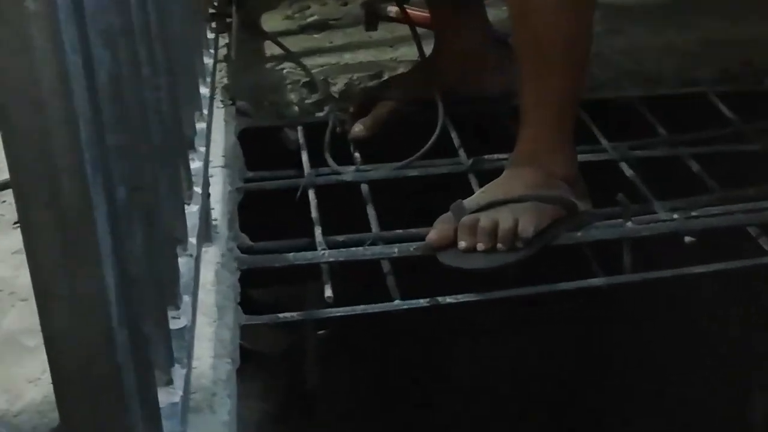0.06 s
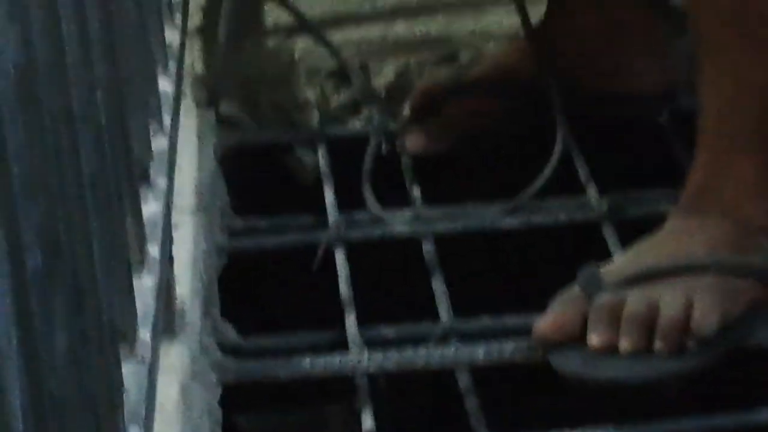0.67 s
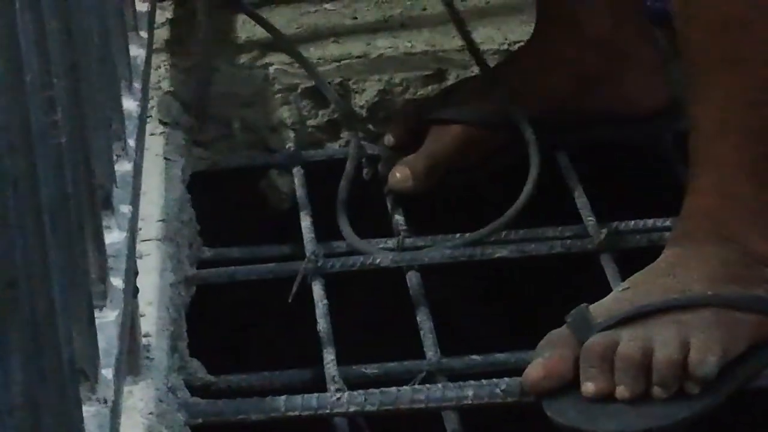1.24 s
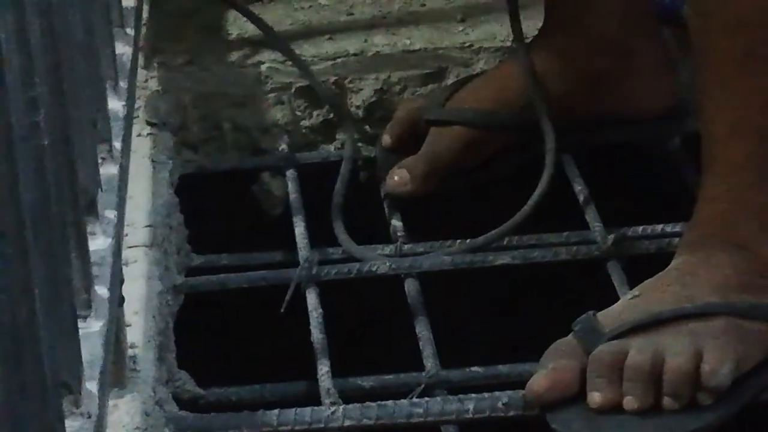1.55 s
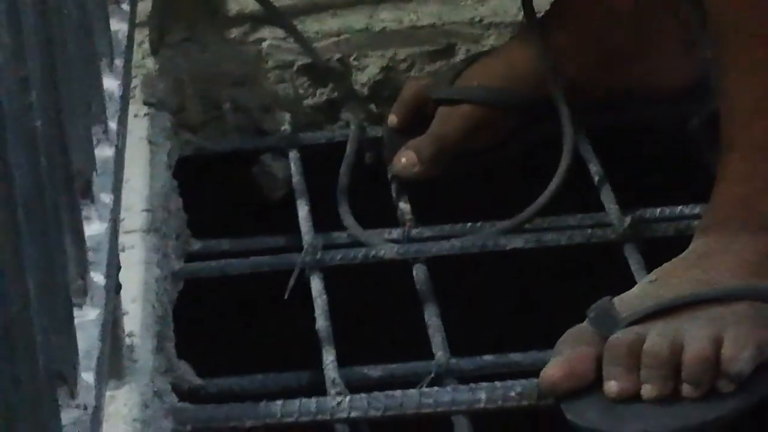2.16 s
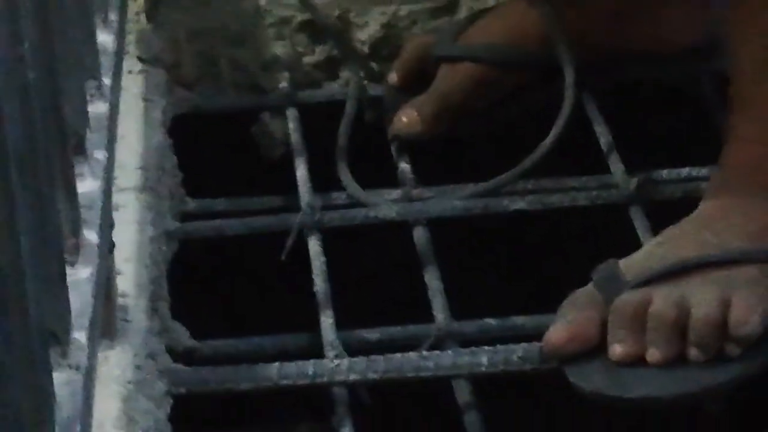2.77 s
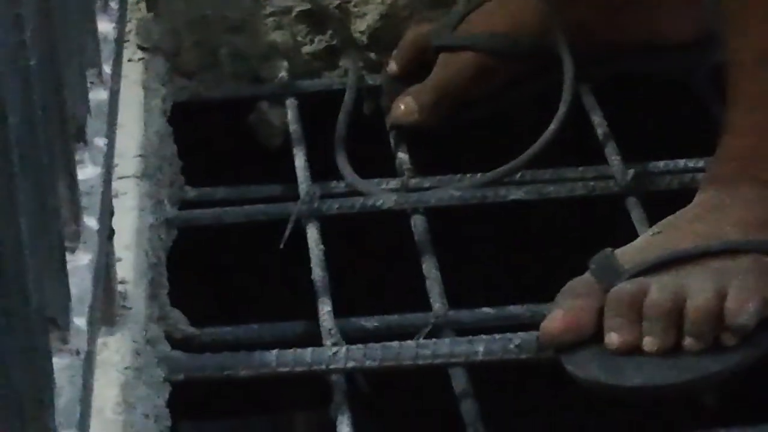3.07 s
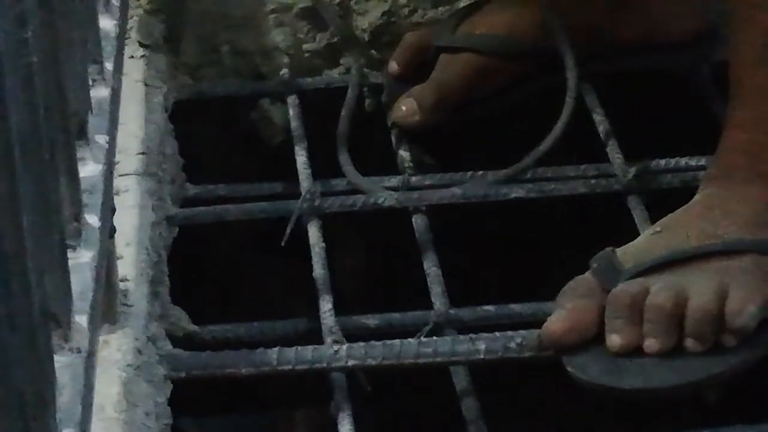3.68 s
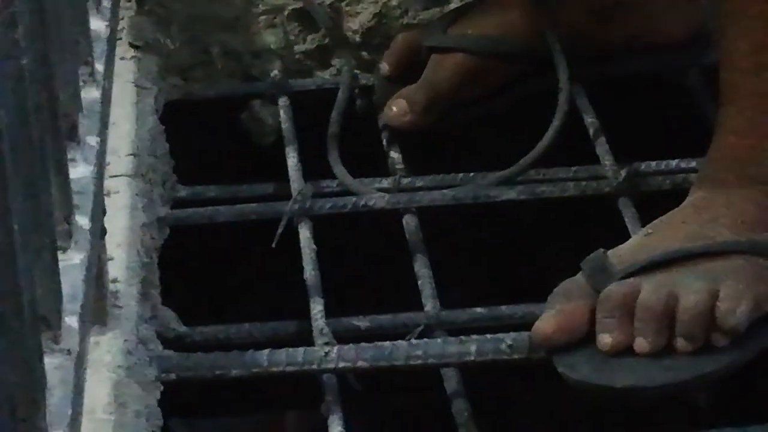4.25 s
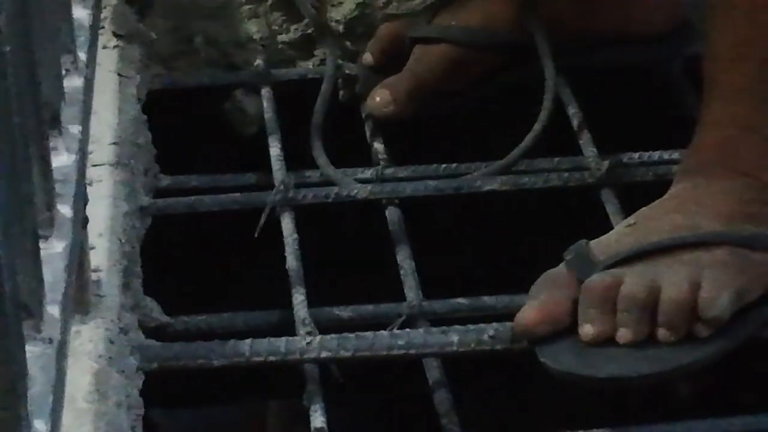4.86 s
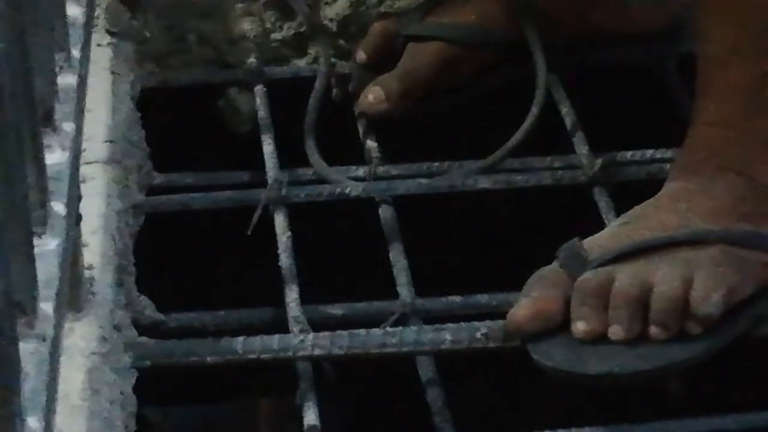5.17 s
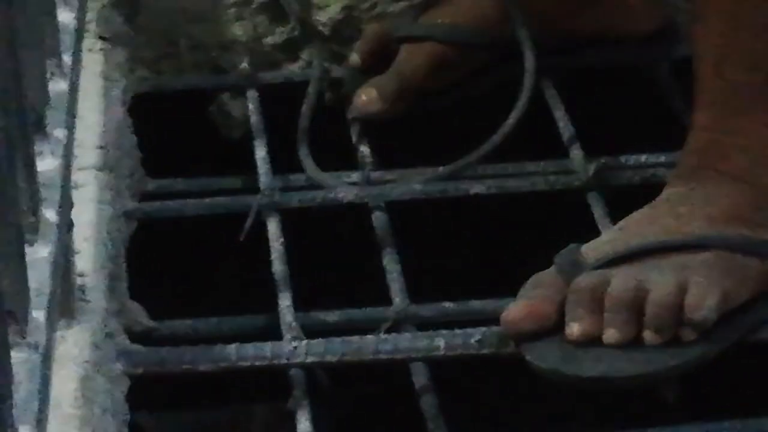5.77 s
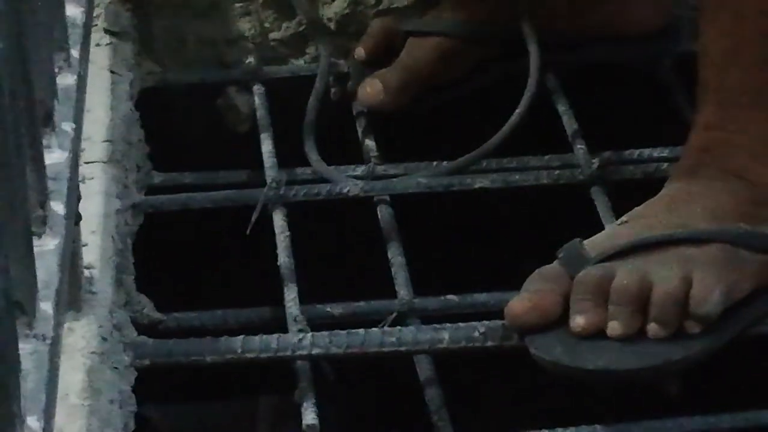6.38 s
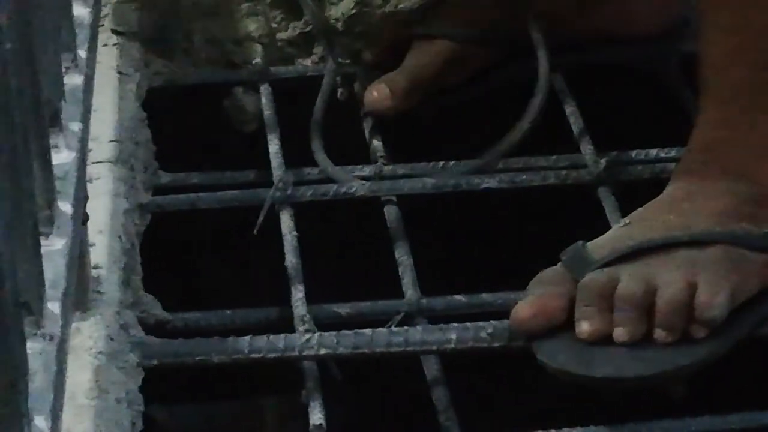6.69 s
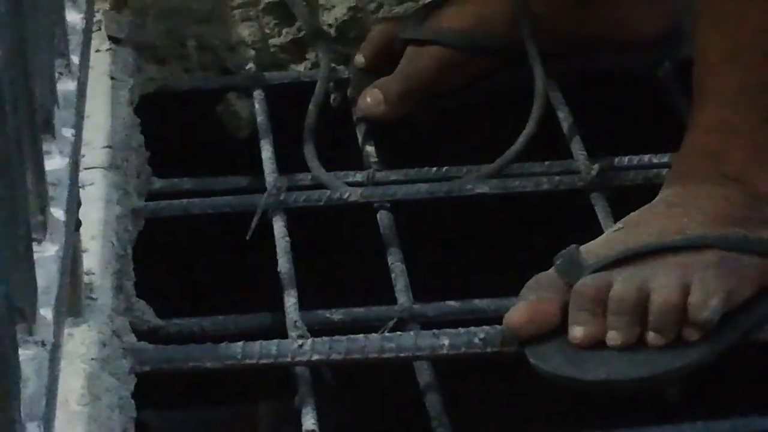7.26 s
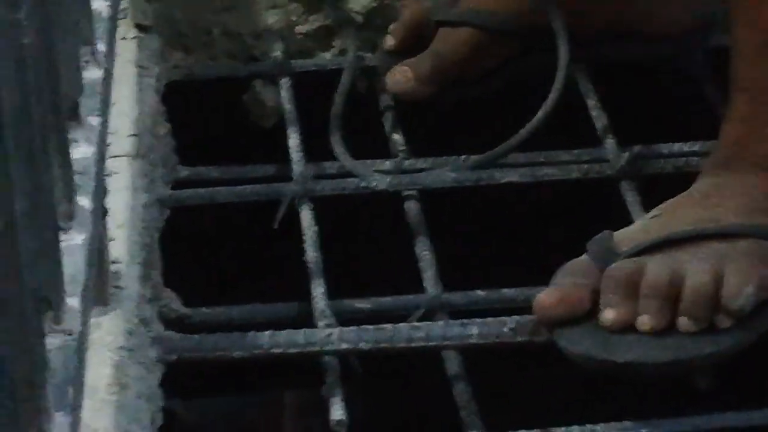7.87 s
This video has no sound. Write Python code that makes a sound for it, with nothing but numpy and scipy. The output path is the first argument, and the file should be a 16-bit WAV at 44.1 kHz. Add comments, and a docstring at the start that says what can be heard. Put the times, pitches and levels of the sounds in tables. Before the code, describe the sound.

An electric demolition hammer works on concrete about a metre away, outdoors, over a faint low site rumble. Separate sharp blows at 0.2 seconds speed into loud, bright, metallic hammering, and concrete cracks off at about 1 second. The motor whines briefly, then coasts down with a hissing rattle and falling pitch. It revs again at 3.1 seconds for a very short burst, ending with chisel clinks and a crack at 3.5, then winds down again. Between 4.6 and 5.4 seconds come soft dull knocks and a brief scrape on a steel bar, and a faint thin whistle slides down around 5.3. The motor restarts at 5.5 and hammers until 6.5, with thumps and splitting concrete, ending in a sharp crack and clinks. It races briefly and coasts. At 7.5 seconds separate blows return, quickening into a last short burst just before 8.

```python
"""Demolition hammer on concrete

An electric hammer chips at a slab in short bursts, about a metre away. Each blow cracks off the
steel chisel and shakes the slab, and now and then a piece splits off. The motor drives a fan,
whining gears and the striker; between bursts it coasts down with a rushing rattle. In the pauses
the tool is shifted with dull knocks and a thin whistle falls, over the low rumble of the site."""
import sys
import numpy as np
from scipy import signal
from scipy.fft import rfft, irfft, next_fast_len
from scipy.io import wavfile
from scipy.ndimage import uniform_filter1d

SR = 44100
rng = np.random.default_rng(int(sys.argv[2]) if len(sys.argv) > 2 else 0)


def master(y):
    """Save y as 16-bit WAV."""
    cut = np.clip(np.atleast_2d(y).T, -1, 1)
    pcm = np.round(cut * 32767)  # scale
    wavfile.write(sys.argv[1], SR, pcm.astype(np.int16))


N = 349713
TIME = np.arange(N) / SR

# Bursts of hammering. Each row: time the chisel is set on the concrete in seconds, time of the first driven
# blow in seconds, end in seconds.
BURSTS = [(.216, .4629, 1.015), (3.243, 3.243, 3.465), (5.599, 5.599, 6.52), (7.491, 7.8539, 7.929)]
# How hard the blows land, a curve per burst. Each row: time in seconds, chisel, slab and thump in dB.
FORCE = [
    [(.49, -5.5, -26, -33), (.64, -6, -21.5, -40), (.78, -7, -23.5, -26), (.9, -7.5, -33, -18),
     (.96, -11.5, -27.5, -31), (1.0, -10, -47, -27)],
    [(3.24, -9, -35, -39), (3.29, -8.5, -30, -49), (3.38, -5, -24.5, -26), (3.45, -12.5, -39, -32)],
    [(5.6, -9.5, -33.5, -57), (5.71, -9, -27, -25), (5.92, -9, -26.5, -30), (6.1, -9.5, -24, -21.5),
     (6.42, -7.5, -25, -22), (6.51, -11.5, -28.5, -28)],
    [(7.82, -8.5, -28.5, -38), (7.93, -9, -29, -33)],
]
def driven_blows(dig_s=.2):
    """One blow per crank turn. Each row: seconds, chisel dB, slab dB, depth from 0 to 1, thump dB."""
    turns, rows = crank()[1], []
    for (_, start, end), force in zip(BURSTS, FORCE):
        first_turn, last_turn = np.interp([start, end], TIME, turns)
        times = np.interp(np.arange(first_turn, last_turn), turns, TIME)
        chisel_db, slab_db, thump_db = follow(force, times)
        buried = 1 - np.exp(-(times - start) / dig_s)
        rows.append(np.transpose([times, chisel_db, slab_db, buried, thump_db]))
    return np.vstack(rows)


# Colour of the chisel's crack. Each row: frequency in Hz, level in dB.
CHISEL_COLOUR = [(500, -18), (1500, -60), (2800, -15), (3400, -7.5), (4300, -4.5), (5600, -0.5), (7400, 1),
                 (8900, 2.5), (10300, 4), (11800, -0.5), (13000, -1), (14200, -15), (15800, -14)]
def chisel_crack(t, grain, chisel_db, buried, alike=.67):
    """Steel snaps on steel and rebounds; as the chisel digs in, crumbs soften and stretch the crack."""
    bright = blend(grain, noise(CHISEL_COLOUR, len(t)), alike)
    hardness = np.clip((chisel_db + 18) / 8, 0, 1)  # light taps only clack in the gear housing
    bright = blend(bright, noise(GEAR_COLOUR, len(t)), hardness)
    crack = gain_of(-2 - 2.8 * buried) * np.exp(-t / (.0052 * (1 + .45 * buried)))
    rebound = gain_of(-16) * (t > .012) * np.exp(-abs(t - .012) / .005)
    tail = gain_of(-20) * np.exp(-t / .078)
    snap = .302 * (1 - buried) * np.exp(-t / .0009)
    return bright * (crack + rebound + tail + snap)


# Ring of the steel chisel. Each row: pitch in Hz, level in dB, seconds to fall 60 dB.
STEEL_MODES = [(3410, -11, 0.027), (3410, 1, 0.072), (9280, 16, 0.043), (9470, 8, 0.024),
               (10010, 9.5, 0.055), (12700, 5, .05)]
def steel_rings(t, count=20):
    """A set of chisel rings: each mode's pitch and strength shift with how the steel is wedged."""
    wedged = [[(hz * rng.uniform(.96, 1.04), db + 4 * rng.standard_normal(), t60)
               for hz, db, t60 in STEEL_MODES] for _ in range(count)]
    return gain_of(-22) * np.array([ringing(modes, t) for modes in wedged])


def chatter(t, rings, count=4, latest_s=.013):
    """The buried chisel bounces at random moments after a blow, grinding grit and ringing its steel."""
    out = np.zeros((2, len(t)))
    for start, db in zip(latest_s * rng.uniform(.1, 1, count), rng.normal(-9, 2.5, count)):
        grit = noise(CHISEL_COLOUR, 512) * np.exp(-t[:512] / .001)
        add(out, start, gain_of(db) * grit)
        add(out, start, gain_of(db) * rng.choice(rings))
    return out


def thump(t, delay_s=.003, width_s=.00125):
    """The slab is kicked, sinks and springs back: a short push, then a low pulse of suction."""
    lag_s = np.array([[0], [.00015]])  # the suction reaches the right a little later
    u = (t - delay_s - lag_s) / width_s
    push = .5 * np.sin(np.pi * np.minimum(t / width_s, 1)) ** 2
    return push - np.exp(-u ** 2) + .14 * np.exp(-(u / 4 - 1) ** 2)


# Single blows of the coasting striker, and light taps. Each row: start in seconds, chisel and slab in dB.
SINGLE_BLOWS = [(.053, -14, -60), (.071, -19, -52), (0.085, -16, -56), (0.1184, -17, -54), (.135, -19, -56),
                (0.154, -24, -56), (0.2149, -7, -32.5), (0.2548, -8, -35), (0.297, -4, -29.5),
                (0.3421, -6, -30.5), (0.3881, -5, -28.5), (0.4321, -5, -25.5), (2.585, -29.5, -39),
                (3.107, -24.5, -60), (3.475, -11.5, -24), (5.2688, -20, -33), (5.506, -26.5, -53),
                (6.53, -4, -24.5), (7.4918, -9, -31), (7.5257, -9, -27), (7.5617, -10, -28),
                (7.601, -10.5, -29), (7.6426, -11, -34), (7.6892, -11.5, -29), (7.738, -11.5, -28),
                (7.79, -12, -28), (7.8255, -9, -29)]
# Colour of struck concrete. Each row: frequency in Hz, level in dB.
SLAB_COLOUR = [(30, -5), (100, 0), (220, 1.5), (300, -2.5), (420, -0.5), (560, -8.5), (760, -1),
               (1020, -1.5), (1400, -3.5), (2200, -12.5), (4000, -9), (9000, -38)]
# Ring of the slab and its mesh. Each row: pitch in Hz, level in dB, seconds to fall 60 dB.
SLAB_MODES = [(108, -3, 0.21), (140, -16, 0.15), (163, -6, 0.12), (217, -4.5, 0.23), (250.7, -7, 0.55),
              (306.5, -3, 0.56), (420, -6.5, 0.13), (456.4, -9.5, 0.19), (642, -7, 0.13), (719, -11, 0.21),
              (993, -1.5, 0.19), (1094, -4, 0.18), (1250, -28, 0.14), (1290, -22, 0.14), (1770, -17, 0.15)]
def hammer(carry_over=.8836, slab_decay_s=.064):
    """Blows crack off the chisel and shake the slab; pieces break away and the loose chisel clinks."""
    out, t = np.zeros((2, N)), np.arange(8192) / SR
    attack = 1 - np.exp(-t / .0003)
    rings = steel_rings(t)
    modes = gain_of(-10) * np.array([ringing([mode], t) for mode in SLAB_MODES])
    grain, slab = noise(CHISEL_COLOUR, len(t)), noise(SLAB_COLOUR, len(t))
    mode_db = np.zeros(len(modes))
    driven = driven_blows()
    blows = [tuple(blow[:4]) for blow in driven] + [(*blow, 0) for blow in SINGLE_BLOWS]
    for start, chisel_db, slab_db, buried in sorted(blows):
        # the concrete crumbles, so each blow meets the slab a little differently from the last
        slab = blend(slab, noise(SLAB_COLOUR, len(t)), carry_over)
        grain = blend(grain, noise(CHISEL_COLOUR, len(t)), carry_over)
        mode_db = blend(mode_db, rng.normal(0, 2.5, len(modes)), carry_over)
        body = np.tensordot(gain_of(mode_db), modes, 1) + .64 * slab * np.exp(-t / slab_decay_s)
        chisel = attack * (chisel_crack(t, grain, chisel_db, buried) + rng.choice(rings))
        chisel += buried * chatter(t, rings)
        add(out, rng.normal(start, .00003),
            gain_of(rng.normal(chisel_db, .7)) * chisel + gain_of(slab_db) * body * attack)
    for start, *_, thump_db in driven:
        add(out, start, gain_of(rng.normal(thump_db, 1.5)) * thump(t))
    return out + breaks(t, attack, rings) + clinks(t, attack)


# The concrete gives way. Each row: start in seconds, crack, thump and pop in dB.
BREAKS = [(0.9514, -12, -15, -5.5), (.987, -8, -30, -25), (1.007, -10, -38, -34), (3.496, -11.5, -25, -43),
          (5.863, -28, -19, -28), (5.9592, -29, -30, -17), (5.9976, -13, -17, -23), (6.0524, -23, -24, -16),
          (6.1452, -19, -20, -28), (6.238, -28, -19, -28), (6.365, -23, -17, -26), (6.53, -17, -13, -9.5),
          (6.545, -10.5, -34, -15), (7.9243, -28, -18, -18)]
# Colour of splitting concrete. Each row: frequency in Hz, level in dB.
SPLIT_COLOUR = [(80, 2.5), (400, -12.5), (1000, -4.5), (2000, -5), (3400, -1), (6000, -5), (10000, -15),
                (15800, -7.5)]
def breaks(t, attack, rings, pop_delay_s=.00142, pop_width_s=.00021):
    """A piece splits off with a crack, a thump and a pop: one sharp push of air and its rebound."""
    out = np.zeros((2, N))
    u = (t - pop_delay_s) / pop_width_s
    pop = -2 * u * np.exp(-u ** 2)
    for start, crack_db, thump_db, pop_db in BREAKS:
        crack = attack * (noise(SPLIT_COLOUR, len(t)) * np.exp(-t / .0089) + .5 * rng.choice(rings))
        add(out, start, gain_of(crack_db) * crack + gain_of(thump_db) * thump(t) + gain_of(pop_db) * pop)
    return out


# Clinks of the chisel. Each row: start in seconds, level in dB.
CLINKS = [(1.012, -20.5), (2.582, -34), (2.69, -47), (2.73, -45), (3.335, -24.5), (3.415, -25),
          (3.474, -15.5), (3.497, -22), (6.567, -19.5), (6.586, -22), (6.606, -21), (6.628, -33)]
# Ring of the chisel hanging loose. Each row: pitch in Hz, level in dB, seconds to fall 60 dB.
LOOSE_MODES = [(3440, -4.5, 0.18), (3394, 0.5, 0.12), (3650, -5.5, 0.18)]
def clinks(t, attack):
    """The loose chisel clinks in its holder with a buzzy ring."""
    out = np.zeros((2, N))
    for start, db in CLINKS:
        buzz = 1 + .6 * unit_rms(uniform_filter1d(rng.standard_normal((2, len(t))), 130))
        add(out, start, gain_of(db) * buzz * attack * ringing(LOOSE_MODES, t)[0])
    return out


def coast(speed, t, drag_s=1.944, friction=22.83):
    """Speed t seconds after the power is cut: air drag and dry friction bring the rotor to rest."""
    stall = friction * drag_s
    return np.maximum((speed + stall) * np.exp(-np.maximum(t, 0) / drag_s) - stall, 0)


# Trigger pulls, in seconds and crank turns a second. Each row: switch-on time, speed under load,
# spin-up time, time the chisel lifts, switch-off time, speed at release.
TRIGGER_PULLS = [(.3996, 53.89, .1158, 1.023, 1.116, 58.2), (3.11, 51.2, .085, 3.45, 3.645, 58.7),
                 (5.497, 54.9, .123, 6.583, 6.79, 60.7), (7.785, 46.9, .0617, 8.0, 8.1, 58)]
def crank(first_speed=34.66):
    """Crank speed and turns made so far: it spins up, races when the chisel lifts, then coasts."""
    speed = coast(first_speed, TIME)
    for on, loaded, spin_up_s, lift, off, top in TRIGGER_PULLS:
        shortfall = np.interp(on, TIME, speed) - loaded
        driven = loaded + shortfall * np.exp(-np.maximum(TIME - on, 0) / spin_up_s)
        driven += (top - driven) * np.interp(TIME, [lift, off], [0, 1])
        speed = np.select([TIME < on, TIME < off], [speed, driven], coast(top, TIME - off))
    return speed, np.cumsum(speed) / SR


# The motor with the chisel in the air. Each row: turns a second, gear hiss, fan rush and whine in dB.
FREE_LEVELS = [(0, -55.5, -52, -59), (3.22, -41, -42, -59), (7.46, -33, -37.5, -57),
               (14.31, -27.5, -33, -50), (25.6, -21.5, -30.5, -48), (33.3, -17, -27, -35),
               (43, -16, -25, -29), (51.3, -16, -26, -25), (60.5, -16, -26.5, -15)]
# The same columns with the tool pressed on the concrete, its loose parts held still.
PRESSED_LEVELS = [(19.9, -26.5, -42, -52), (28, -26.5, -33.5, -35), (40.5, -23.5, -32.5, -52),
                  (50.6, -22, -30, -46), (54.5, -19.5, -28, -50), (53.2, -18, -27, -24)]
# Swells and dips, biggest as the current comes on and the fan howls.
# Each row: time in seconds, gain in dB for gear hiss, fan rush and blade rasp.
STRAIN = [(0, 1, 1.5, -12), (.2, -3.5, 0, 2), (1.1, -0.6, -0.5, -7.5), (2.2, -0.5, -1, 1),
          (2.6, -1, 0.5, 0), (3.1, 1.5, 0, 0), (3.135, 0.5, 3.5, -9), (3.17, 1, 2, 9), (3.24, -3.5, 3.5, 9),
          (3.3, -1, -0.5, -7), (5.5, 1, 1.5, -1), (5.515, -7, 1, -6), (5.538, -4, -6, 0),
          (5.556, 2.5, 7, 14), (5.6, 0.5, 2.5, 9), (5.66, 0, 0, -10)]
def motor_levels(speed, seat_s=.012, ease_off_s=.17):
    """Gear hiss, fan rush, blade rasp and whine in dB, set by speed, strain and pressing down."""
    press = sum(np.interp(TIME, [start - seat_s, start, end, end + ease_off_s], [0, 1, 1, 0])
                for start, _, end in BURSTS)
    more_hiss, more_fan, more_rasp = (1 - press) * follow(STRAIN)
    hiss, fan, whine = (1 - press) * follow(FREE_LEVELS, speed) + press * follow(PRESSED_LEVELS, speed)
    return hiss + more_hiss, fan + more_fan, fan - 4 + more_rasp, whine


# Drift of the motor's tones about the crank speed. Each row: time in seconds, offset in turns a second.
DRIFT = [(.85, .75), (1.0, .55), (1.15, -.35), (1.35, -.5), (1.9, .9), (2.45, 1.15), (3.55, -.45),
         (3.85, -.2), (4.6, 1.1), (5.0, 1), (5.9, -.3), (6.45, -.05), (6.79, -.55), (6.82, .6), (7.0, .1),
         (7.45, .8)]
# Colour of the gear hiss. Each row: frequency in Hz, level in dB.
GEAR_COLOUR = [(1500, -29.5), (2800, -26), (3350, -11), (4000, -8.5), (6000, -6.5), (7200, -4.5),
               (8000, -0.5), (8800, 1), (9700, -2), (10600, -8.5), (12000, -14), (13500, -19), (15800, -26)]
def motor():
    """Gear hiss and fan rush, shaken by the idling piston, with the tones of blades and gears on top."""
    speed, turns = crank()
    tone_speed = speed + follow(DRIFT)[0]
    hiss_db, fan_db, rasp_db, whine_db = motor_levels(speed)
    slack = np.interp(speed, [0, 30, 55], [.7, 1.3, .6])  # the parts clatter most at middling speed
    rattle_db = slack * (np.cos(4 * np.pi * turns + wander(44)) + .9 * wander(133))
    hiss = noise(GEAR_COLOUR) * gain_of(hiss_db + rattle_db + wander(9.7))
    rush = fan_rush(fan_db + .92 * rattle_db)
    rasp, octave = fan_blades(tone_speed, rasp_db, fan_db)
    whine = gear_whine(speed, tone_speed) * gain_of(whine_db)
    growl = bearing_growl(speed, tone_speed) * gain_of(fan_db)
    return reflections(hiss + rush + rasp) + octave + growl + whine


# Colour of the fan's air. Each row: frequency in Hz, level in dB.
FAN_COLOUR = [(60, -54), (300, -8), (600, -28), (760, -4.5), (950, 0), (1300, -4), (1750, 3), (2600, 2),
              (3400, 7.5), (4300, -5), (7000, -13), (11000, -64), (15800, -35)]
# Resonances of the housing. Each row: pitch in Hz, width in Hz, level in dB against the fan.
HOUSING_MODES = [(1033, 180, -18), (1867, 430, -18.5)]
def fan_rush(level_db):
    """Fluttering air rushes from the fan and stirs the plastic housing."""
    housing = sum(gain_of(db) * rough_pair(hz, width) for hz, width, db in HOUSING_MODES)
    return (noise(FAN_COLOUR) + housing) * gain_of(level_db + 1.04 * wander(36))


# How the housing lifts the blade tone's octave. Each row: frequency in Hz, level in dB against the fan.
OCTAVE_RESPONSE = [(700, -43), (1100, -9.5), (1500, -14), (2200, -13), (3200, -11), (6000, -28)]
def fan_blades(speed, rasp_db, fan_db, passes_per_turn=66):
    """The blade tone rasps as it sweeps through the vents' resonance, its octave through the housing's."""
    hz = passes_per_turn * speed
    vents_db = read_spectrum([(700, -33), (1100, -12), (1500, -16), (2400, -5.5), (3000, -3)], hz)
    rasp = rough_pair(hz, 55) * gain_of(rasp_db + vents_db)
    octave = rough_pair(2 * hz, 35) * gain_of(fan_db + read_spectrum(OCTAVE_RESPONSE, 2 * hz))
    return rasp, octave


def gear_whine(speed, tone_speed, teeth_per_turn=146.4):
    """Meshing teeth whine; the slowing gears run loose and the tone roughens."""
    backlash_hz = np.interp(speed, [38, 54], [135, 45])
    phase = 2 * np.pi * np.cumsum(teeth_per_turn * tone_speed + backlash_hz * wander(115.5)) / SR
    return np.array([np.sin(phase + .7 * wander(15) + .35 * wander(200)) * gain_of(3 * wander(60))
                     for _ in range(2)])


# Coasting growls. Each row: multiple of the crank speed, width in Hz, level in dB against the fan,
# loudest speed in turns a second.
GROWLS = [(27.2, 45, -16.5, 33), (53.9, 60, -16, 36), (89.4, 77, -19, 29), (109.8, 90, -8, 48),
          (161, 60, -15, 22), (197, 80, -12, 17)]
def bearing_growl(speed, tone_speed, speed_spread=6.3):
    """While the motor coasts, bearings and gears growl, each within its own range of speeds."""
    coasting = uniform_filter1d(1.0 * (np.gradient(speed) < 0), 2000)
    out = np.zeros((2, N))
    for multiple, width, db, loudest in GROWLS:
        swell = np.exp(-((speed - loudest) / speed_spread) ** 2 / 2)
        out += rough_pair(multiple * tone_speed, width) * gain_of(db) * swell
    return coasting * out


# Dull knocks. Each row: start in seconds, level in dB, pitch in Hz, decay in seconds,
# judder as a share of the pitch.
KNOCKS = [(1.811, -35, 444, 0.062, 0.091), (1.879, -34, 408, 0.022, 0.17), (4.608, -30.5, 338, 0.052, 0.21),
          (4.665, -32.5, 274, 0.073, 0.14), (4.704, -24.5, 404, 0.037, 0.15),
          (4.823, -35, 432, 0.044, 0.14), (5.272, -35.5, 246, 0.036, .08),
          (5.287, -24.5, 202, 0.022, 0.049), (5.318, -25.5, 107.6, 0.041, 0.036),
          (5.347, -36, 270, 0.018, .06), (5.362, -23, 115, 0.018, .04), (6.527, -15, 48, 0.023, .02)]
def knocks():
    """The tool is pulled free and shifted, and once the slab heaves under a break: rough, damped bumps with a
    scuff of grit."""
    out, t = np.zeros((2, N)), np.arange(12000) / SR
    for start, db, hz, decay_s, roughness in KNOCKS:
        judder = unit_rms(uniform_filter1d(rng.standard_normal(len(t)), 150))
        ring = np.sin(2 * np.pi * np.cumsum(hz * (1 + roughness * judder)) / SR)
        scuff = roughness * gain_of(11) * noise(SLAB_COLOUR, len(t))
        envelope = (1 - np.exp(-t / .005)) * np.exp(-t / decay_s)
        add(out, start, gain_of(db) * (.97 * ring + scuff) * envelope)
    return out


# One brief scrape. Each row: time in seconds, level in dB.
SCRAPE = [(4.59, -70), (4.608, -41), (4.65, -70), (4.71, -36), (4.76, -44), (4.81, -35.5), (4.89, -45),
          (4.94, -70)]
# Resonances of the bar. Each row: pitch in Hz, width in Hz, level in dB.
BAR_MODES = [(767, 13, -6.5), (1185, 34, -9), (1280, 46, -11)]
def bar_scrape():
    """Scraping along a steel bar rubs its resonances into rough tones."""
    bar = sum(gain_of(db) * rough_tone(hz, width) for hz, width, db in BAR_MODES)
    on = (TIME > SCRAPE[0][0]) & (TIME < SCRAPE[-1][0])
    return on * bar * gain_of(follow(SCRAPE)[0])


# A thin whistle before the third burst. Each row: time in seconds, pitch in Hz, relative level in dB.
WHISTLE = [(5.17, 1930, -70), (5.25, 1750, -45), (5.29, 1640, -56), (5.33, 1510, -43), (5.38, 1350, -47),
           (5.44, 1140, -40), (5.49, 990, -47), (5.55, 850, -51)]
def whistle(fuzz_hz=50):
    """A fuzzy tone in a halo of hiss slides down about an octave."""
    hz, db = follow(WHISTLE)
    on = (TIME > WHISTLE[0][0]) & (TIME < WHISTLE[-1][0])
    phase = 2 * np.pi * np.cumsum(hz + fuzz_hz * wander(91)) / SR
    tone = np.array([np.sin(phase + .5 * wander(29.8)) + gain_of(-3) * rough_tone(hz, 90)
                     for _ in range(2)])
    return on * gain_of(db + 4) * tone


# Swell of the rumble. Each row: time in seconds, level in dB.
RUMBLE = [(0, -43.5), (1.3, -54.5), (2.3, -39.5), (3.2, -43), (4.1, -69), (4.5, -42), (5.5, -44),
          (7.2, -52), (7.93, -35)]
# Colour of the rumble. Each row: frequency in Hz, level in dB.
RUMBLE_COLOUR = [(20, -42), (50, 0.5), (75, -6), (105, -1.5), (140, -7), (200, -11), (300, -13.5),
                 (600, -17.5), (1500, -17), (5000, -20.5), (15000, -41)]
# A sinking drone. Each row: time in seconds, pitch in Hz, level in dB.
DRONE = [(1.2, 144.7, -59), (1.8, 146, -52.5), (2.6, 144.2, -44), (3.1, 124.5, -48), (3.9, 85.2, -60),
         (4.5, 72, -66), (5.0, 69.9, -47.5), (5.5, 70, -47.5), (5.8, 68.6, -65)]
def site():
    """The site rumbles and a low drone wavers, heard in the pauses."""
    rumble = noise(RUMBLE_COLOUR) * gain_of(follow(RUMBLE)[0] + 2.2 * wander(22))
    drone_hz, drone_db = follow(DRONE)
    return rumble + rough_tone(drone_hz, 9.5) * gain_of(drone_db)


def reflections(x, echo_db=-13, count=7):
    """The fence and slab edges return a few early copies, different on each side."""
    taps = np.zeros((2, 1000))
    taps[:, 0] = 1
    delays = rng.integers(60, 1000, (2, count))
    np.put_along_axis(taps, delays, gain_of(echo_db) * rng.choice([-1, 1], (2, count)), 1)
    return signal.oaconvolve(x, taps / np.linalg.norm(taps[0]), axes=1)[:, :N]


# How alike left and right are, before a roll-off above 420 Hz. Each row: frequency in Hz, share of 1.
LIKENESS = [(60, 1), (250, 1), (500, 0), (1200, 1), (3000, 0)]
def noise(colour, size=N):
    """Coloured stereo noise: alike in the bass, unrelated in the treble."""
    padded = next_fast_len(size, True)
    hz = np.fft.rfftfreq(padded, 1 / SR)
    shared, apart = rfft(rng.standard_normal((2, padded)))
    same = np.clip(read_spectrum(LIKENESS, hz), 0, 1) / (1 + (hz / 420) ** 2)
    pair = shared * np.sqrt(1 + same) + np.array([[1], [-1]]) * apart * np.sqrt(1 - same)
    return unit_rms(irfft(pair * gain_of(read_spectrum(colour, hz)), padded)[:, :size])


def wander(hz):
    """A random wobble of rms one, up to about hz."""
    size, step_s = next_fast_len(N // 16 + 2, True), 16 / SR
    lowpass = np.exp(-(np.fft.rfftfreq(size, step_s) / hz) ** 2)
    slow = irfft(rfft(rng.standard_normal(size)) * lowpass, size)
    return unit_rms(np.interp(TIME, np.arange(size) * step_s, slow))


def rough_tone(hz, width):
    """Noise rubbing one resonance."""
    phase = 2 * np.pi * np.cumsum(hz * np.ones(N)) / SR
    return wander(width) * np.cos(phase) + wander(width) * np.sin(phase)


def rough_pair(hz, width):
    """A separate rough tone on each side."""
    return np.array([rough_tone(hz, width) for _ in range(2)])


def ringing(modes, t):
    """Dying modes; the treble ones reach each side at their own phase."""
    return sum(gain_of(db - 60 * t / t60)
               * np.sin(2 * np.pi * (hz * t + min(hz / 1500, 1) * rng.random((2, 1))))
               for hz, db, t60 in modes)


def blend(a, b, share):
    """Crossfade giving a this share of the power."""
    return np.sqrt(share) * a + np.sqrt(1 - share) * b


def gain_of(db):
    """Decibels to amplitude."""
    return 10 ** (np.asarray(db) / 20)


def unit_rms(x):
    """Scales to an rms of one."""
    return x / np.sqrt(np.mean(x ** 2) + 1e-20)


def read_spectrum(points, hz):
    """Reads a curve on a log-frequency axis."""
    f, value = np.transpose(points)
    return np.interp(np.log(hz + 1), np.log(f + 1), value)


def follow(rows, at=TIME):
    """Reads every column of a curve at the given times or speeds."""
    axis, *columns = np.transpose(rows)
    return np.array([np.interp(at, axis, column) for column in columns])


def add(mix, start, sound):
    """Mixes a stereo sound in at start seconds."""
    part = mix[:, max(round(start * SR), 0):][:, :sound.shape[-1]]
    part += sound[..., :part.shape[1]]


# Stereo lean. Each row: frequency in Hz, left minus right in dB.
LEAN = [(200, 0), (500, -1), (1100, -0.5), (1900, 1.5), (2800, -1.5), (4200, -3), (6400, 1.5), (9000, 6),
        (11500, -6), (14000, 0)]
def scene():
    """The tool and the site, coloured differently on each side by the nearby metal fence."""
    mix = site() + motor() + hammer() + knocks() + bar_scrape() + whistle()
    lean_db = read_spectrum(LEAN, np.fft.rfftfreq(N, 1 / SR))
    return irfft(rfft(mix) * gain_of(np.array([lean_db, -lean_db]) / 2), N)


def record(dry, cutoff_hz=15780):
    """Rounds off the loudest peaks, then cuts the top treble."""
    rounded = dry / (1 + dry ** 6) ** (1 / 6)
    lowpass = signal.firwin(511, cutoff_hz, window=("kaiser", 9), fs=SR)
    return signal.oaconvolve(rounded, lowpass[None], "same")


dry = scene()
out = record(dry)
master(out)
```